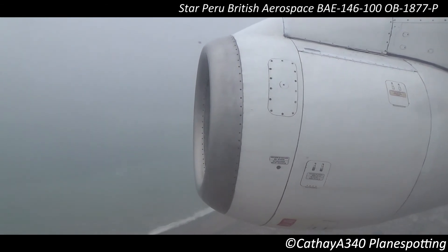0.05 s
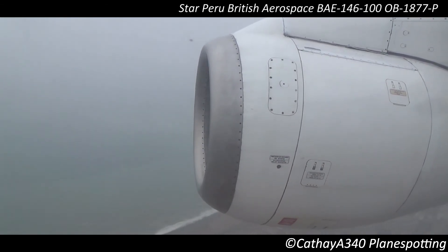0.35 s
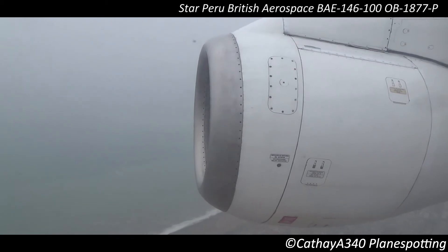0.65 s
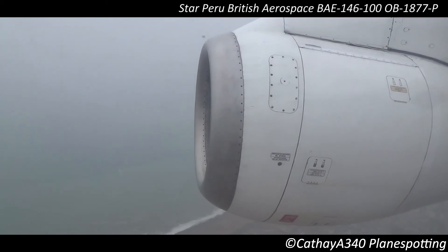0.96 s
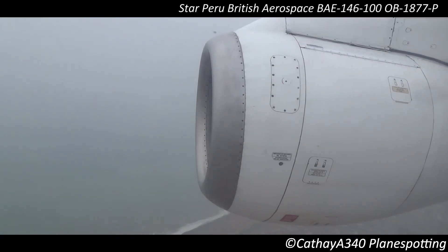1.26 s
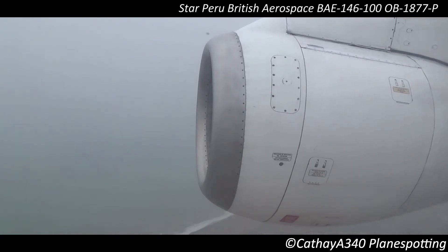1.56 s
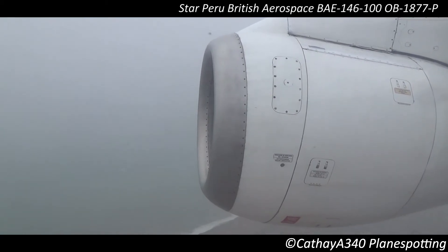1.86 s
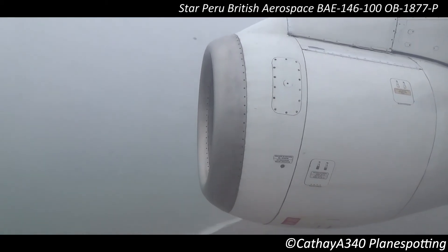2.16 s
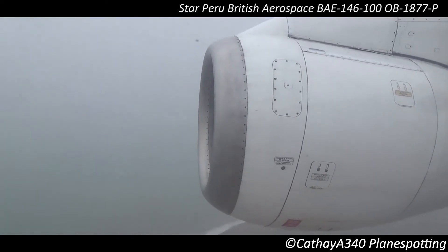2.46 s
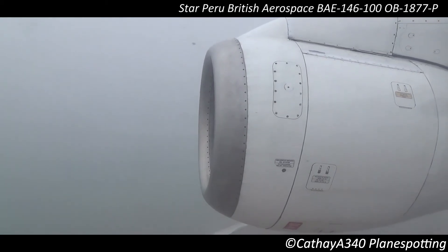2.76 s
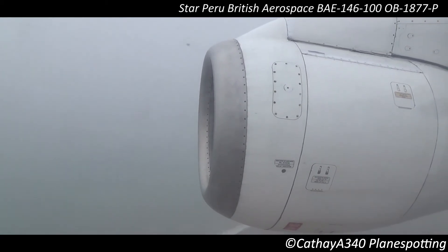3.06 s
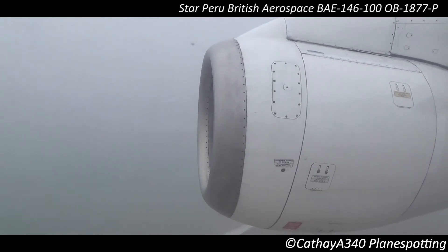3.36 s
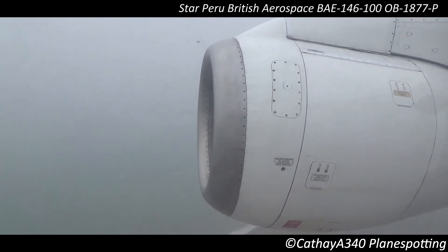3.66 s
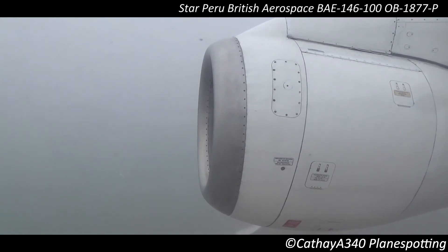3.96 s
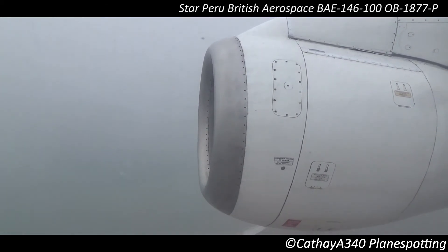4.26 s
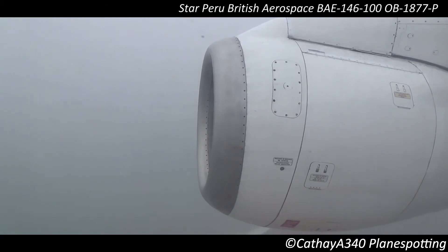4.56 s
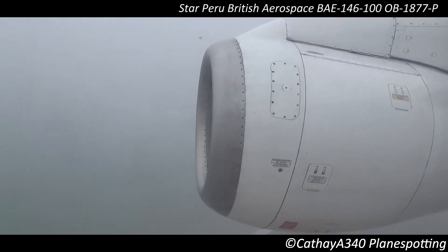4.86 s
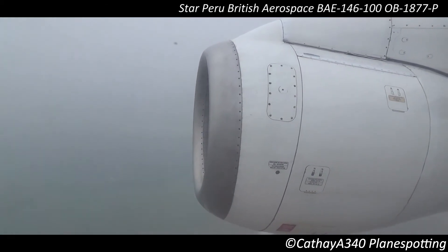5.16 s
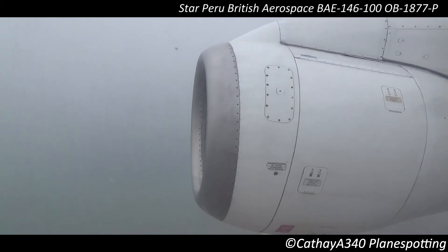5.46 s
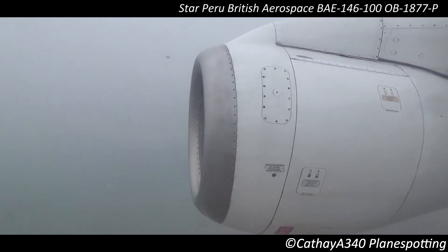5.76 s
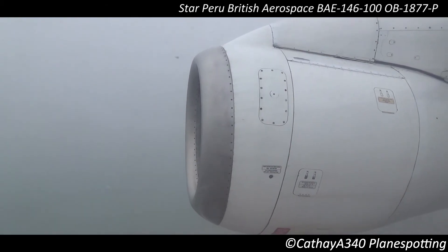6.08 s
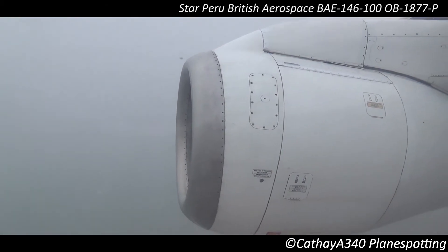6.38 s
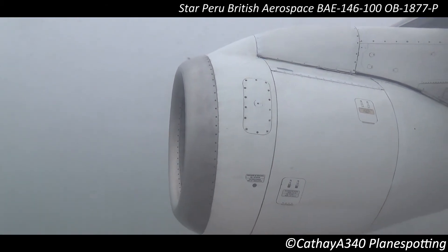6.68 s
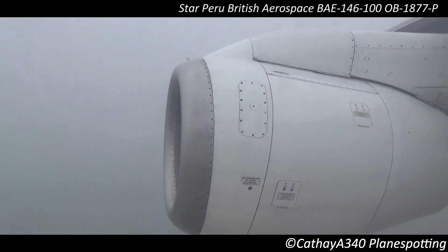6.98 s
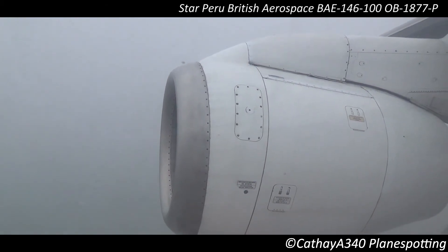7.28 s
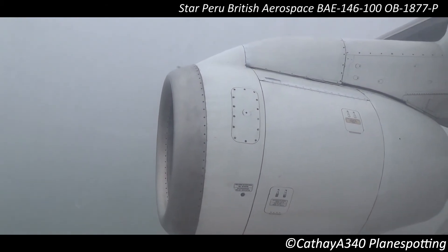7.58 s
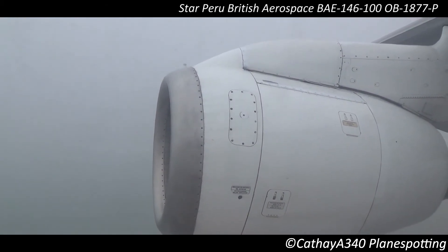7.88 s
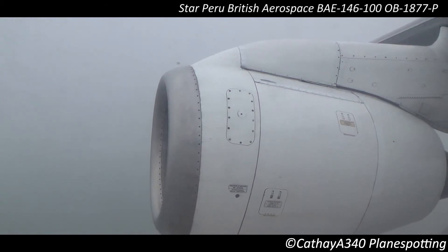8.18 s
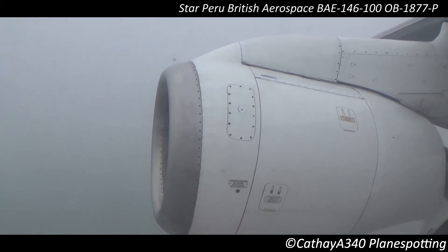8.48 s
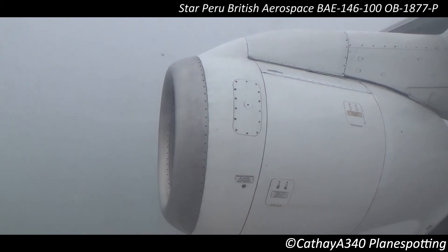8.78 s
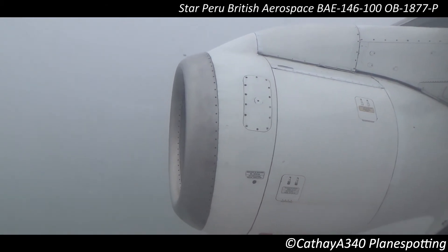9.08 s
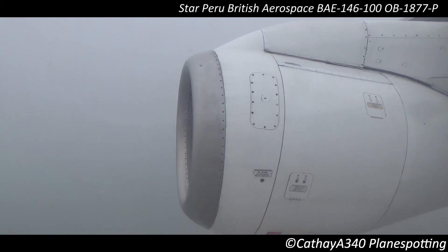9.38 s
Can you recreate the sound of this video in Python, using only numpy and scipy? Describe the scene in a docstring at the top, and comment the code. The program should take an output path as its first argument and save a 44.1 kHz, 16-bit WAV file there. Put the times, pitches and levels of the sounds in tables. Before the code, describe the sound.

From the start, a loud, deep roar of air fills the cabin of a climbing jet airliner, heard at a window beside one engine. The engines beat together in a low throbbing hum, with thin buzzing whines, steady machinery tones and a fine hiss above it. All of this continues for about nine and a half seconds. At about 1.5 seconds the cabin trim gives one dull bump. From there a low, hollow howl, at first blended into the hum, climbs slowly in pitch until the end. It swells and fades, strongest around 3.7, 7 and 8.2 seconds, and shifts a little between left and right. When howl and hum throb together, the whole sound dips slightly, giving a gentle pumping. The deepest rumble eases after 8 seconds, and a faint, sharp plastic click comes at about 9.3 seconds.

```python
"""Inside a four-engined jet airliner in the climb, at a window beside one engine. From the start, air roars
along the fuselage, four fans nearly in step beat in a low hum and shed thin buzz-saw whines, machinery holds
steady tones and a cabin monitor whines thinly. At 1.5 s the trim bumps dully; from then on a hollow howl,
likely air over the moving wing flaps, climbs in pitch. Whenever howl and hum throb together, an automatic gain
control ducks the whole sound, roar and hiss included. Near the end comes a faint click."""
import sys
import numpy as np
from scipy import signal
from scipy.fft import rfft, irfft
from scipy.io import wavfile
from scipy.ndimage import uniform_filter1d, minimum_filter1d

SR = 44100
rng = np.random.default_rng(int(sys.argv[2]) if len(sys.argv) > 2 else 0)


def unload_audio(sound):
    """Save the sound as a 16-bit wav file, at the path given as the first command line argument."""
    columns = np.transpose(np.atleast_2d(sound))
    # keep every value between -1 and 1, then stretch to whole-number steps
    steps = np.round(np.clip(columns, -1, 1) * 32767)
    wavfile.write(sys.argv[1], SR, steps.astype(np.int16))


N = 420258
TIME, BIN_HZ = np.arange(N) / SR, np.fft.rfftfreq(N, 1 / SR)


def amp(db):
    """Amplitude grows tenfold with every 20 dB."""
    return 10 ** (np.asarray(db) / 20)

def unit(x):
    """Normalisation to an rms of one."""
    return x / np.sqrt(np.mean(abs(x) ** 2) + 1e-20)

def curve(rows, column=1):
    """Linear interpolation of one table column over time."""
    rows = np.asarray(rows)
    return np.interp(TIME, rows[:, 0], rows[:, column])

def at_frequency(rows, hz):
    """Interpolation of a spectrum on a logarithmic frequency axis."""
    row_hz, value = np.transpose(rows)
    return np.interp(np.log(hz + 1), np.log(row_hz + 1), value)

def drift(rate_hz):
    """Low-pass noise: a random motion of rms one, mostly slower than rate_hz."""
    steps = N // 128
    hz = np.fft.rfftfreq(steps, 128 / SR)
    slow = irfft(rfft(rng.standard_normal(steps)) * (hz > 0) / (1 + (hz / rate_hz) ** 2), steps)
    return np.interp(TIME, np.linspace(0, TIME[-1], steps), unit(slow))

def turns_of(hz):
    """Phase, in cycles, is the integral of frequency."""
    return np.cumsum(hz * np.ones(N)) / SR

def tone(turns, unsteady, rate_hz):
    """Scattering by turbulence makes part of a sine random, so its level and phase waver."""
    angle = 2 * np.pi * (turns + rng.random())
    in_phase = np.sqrt(2 * (1 - unsteady ** 2)) + unsteady * drift(rate_hz)
    quadrature = unsteady * drift(rate_hz)
    return in_phase * np.cos(angle) + quadrature * np.sin(angle)


# Cabin air and wall panel resonances. Each row: frequency in Hz, width in Hz, lift in dB.
RESONANCES = [(58.7, 4, 10.5), (178.2, 12.5, 4.5), (373, 13, 2), (551.5, 60, 3.5), (827, 96, 2.5),
              (1650, 250, 2)]
# Likeness of the sound at the two ears. Each row: frequency in Hz, correlation from 0 to 1.
EAR_CORRELATION = [(25, .88), (60, .97), (210, .98), (330, .965), (770, .97), (1200, .985), (1800, .998),
                   (4800, .998), (5600, .85), (6400, .72), (8500, .8), (10500, .9), (12000, .9995)]

def cabin_noise(spectrum):
    """Resonance colours broadband noise, which reaches the two ears partly correlated."""
    lift_db = sum(db / (1 + (2 * (BIN_HZ - hz) / width) ** 4) for hz, width, db in RESONANCES)
    common, apart = rfft(rng.standard_normal((2, N))) * amp(at_frequency(spectrum, BIN_HZ) + lift_db)
    correlation = at_frequency(EAR_CORRELATION, BIN_HZ)
    common, apart = common * np.sqrt(1 + correlation), apart * np.sqrt(1 - correlation)
    return unit(irfft([common + apart, common - apart], N))

# Roar through the cabin wall. Each row: frequency in Hz, relative spectral density in dB.
ROAR_SPECTRUM = [(10, -62), (30, -68), (45, -52), (72, -49), (92, -40), (145, -39), (195, -41), (235, -43),
                 (275, -42.5), (350, -47.5), (480, -54.5), (700, -58), (1000, -65), (1400, -71.5),
                 (2200, -79.5), (4000, -93), (8000, -115)]
# Hiss of the intake and air vents. Each row: frequency in Hz, relative spectral density in dB.
HISS_SPECTRUM = [(500, -105), (2000, -80.5), (3000, -83), (4400, -86.5), (6300, -85.5), (7300, -83),
                 (8600, -81), (10000, -83.5), (11500, -84.5), (13000, -87.5), (14000, -90), (15500, -95)]
# Slow airflow changes. Each row: time in seconds, then gains in dB for roar, hiss and the roar's rumble.
AIRFLOW_GAINS = [(0, 0, -0.3, -0.5), (1.6, -0.3, 0.1, 0), (3.55, 0.2, 0, -0.5), (4.0, 0, 0, 0.5),
                 (5.3, 0, -.3, 0.2), (6.6, 0.5, 1.1, .5), (8.1, -0.2, 0.3, -2), (9.53, 0, -0.5, -6)]

def airflow():
    """Boundary-layer turbulence roars and rumbles; a finer hiss flutters with the same gusts."""
    gusts_db = 0.3 * drift(rate_hz=41)
    wall = cabin_noise(ROAR_SPECTRUM)
    rumble = signal.sosfiltfilt(signal.butter(2, 95, fs=SR, output="sos"), wall)
    roar = wall - rumble + amp(curve(AIRFLOW_GAINS, column=3)) * rumble
    roar_db = -15.5 + gusts_db + curve(AIRFLOW_GAINS, column=1)
    hiss_db = -43.5 + gusts_db + curve(AIRFLOW_GAINS, column=2)
    return amp(roar_db) * roar + amp(hiss_db) * cabin_noise(HISS_SPECTRUM)

# The howl's lower mode. Each row: time in seconds, pitch in Hz, level in dB.
LOWER_MODE = [(0, 97.85, -19), (1.4, 97.4, -16.5), (1.75, 98.4, -15.5), (2.15, 99.8, -23.5),
              (2.8, 102.2, -21), (3.0, 102.7, -16.5), (3.44, 106.5, -37), (3.68, 110.7, -8),
              (3.95, 112.3, -14.5), (4.9, 116, -14), (5.28, 118.4, -28), (5.88, 123.3, -18),
              (6.45, 127.4, -19.5), (7.1, 130.8, -12.5), (7.48, 134.3, -17), (8.2, 140.3, -11),
              (9.15, 149.3, -15), (9.53, 152.5, -27)]
# Its mostly weaker upper mode. Each row: time in seconds, level in dB.
UPPER_MODE = [(0, -33), (1.3, -23.5), (4.4, -42), (5.4, -23), (6.45, -44), (6.95, -22), (7.4, -26),
              (8.7, -22), (9.3, -15.5)]

def flap_howl(mode_spacing_hz=15.5):
    """Flow across a gap in the wing excites two fluttering modes that rise together as the gap closes."""
    hz = curve(LOWER_MODE, column=1)
    lower = tone(turns_of(hz), unsteady=0.18, rate_hz=11)
    upper = tone(turns_of(hz + mode_spacing_hz), unsteady=0.14, rate_hz=7)
    return amp(curve(LOWER_MODE, column=2)) * lower + amp(curve(UPPER_MODE)) * upper

# Shaft speeds. Each entry: one fan's turns per second, nearest fan first.
SHAFT_HZ = [109.06, 110.06, 110.75, 111.47]
# Shaft hum. Each entry: one fan's starting level in dB.
SHAFT_HUM_DB = [-18.2, -32.5, -30, -29]
# Strongest shaft harmonics. Each row: one fan's orders, each with its relative level in dB.
SHAFT_ORDERS = [ {2: -37, 9: -49, 13: -52, 16: -59, 24: -66, 25: -65, 40: -59.3, 65: -65, 76: -64, 86: -64,
                90: -64, 95: -66, 99: -67, 104: -68, 120: -64}, {2: -33, 4: -46, 11: -52, 12: -56, 13: -49,
                15: -53, 16: -57, 19: -62, 21: -61, 40: -59.3, 65: -68, 71: -67, 77: -64, 80: -61, 90: -65,
                100: -68}, {2: -37, 40: -64, 80: -66}, {9: -51, 20: -65, 40: -64, 80: -63}]
# The nearest fan's whistle at twice its blade rate. Each row: time in seconds, relative level in dB.
BLADE_WHISTLE = [(0.1, -64), (0.46, -56), (3.49, -48.5), (3.65, -51), (4.87, -59), (5.77, -51), (5.95, -57),
                 (6.81, -50.5), (9.32, -61), (9.4, -59)]
BLADE_COUNT, BUZZ_DB = 40, [-54, -54, -61, -59]
HUM_FADE_DB_PER_S, WHINE_FADE_DB_PER_S = 0.34, 0.1

def fans():
    """Beating: four shafts at slightly different speeds make a throbbing hum; their harmonics whine."""
    shafts = [turns_of(hz + 0.05 * drift(rate_hz=0.4)) for hz in SHAFT_HZ]
    hum = sum(amp(db) * tone(turns, unsteady=0.3, rate_hz=3.4) for turns, db in zip(shafts, SHAFT_HUM_DB))
    hum *= amp(-HUM_FADE_DB_PER_S * TIME)
    # Turbulent air scatters short waves more, so high orders come and go.
    whine = sum(amp(db) * tone(order * turns, unsteady=0.25 + order / 350, rate_hz=1.2)
                for turns, orders in zip(shafts, SHAFT_ORDERS) for order, db in orders.items())
    whine *= amp(1 - WHINE_FADE_DB_PER_S * TIME)
    buzz = sum(amp(db) * buzz_saw(turns) for turns, db in zip(shafts, BUZZ_DB))
    whistle = tone(2 * BLADE_COUNT * shafts[0], unsteady=0.22, rate_hz=25)
    whistle *= amp(3 + curve(BLADE_WHISTLE))
    return hum, whine + buzz + whistle

def buzz_saw(turns, scatter_db=10, samples_per_turn=4096, groups=4):
    """Unequal blade shocks repeat every turn, giving a comb of shaft orders that swell in groups."""
    orders = np.arange(samples_per_turn // 2 + 1)
    envelope_db = at_frequency(HISS_SPECTRUM, orders * SHAFT_HZ[1])
    comb = amp(envelope_db + scatter_db * rng.uniform(-1, 1, len(orders)))
    comb = comb * np.exp(2j * np.pi * rng.random(len(orders)))
    comb *= (orders > 0) & (orders <= 3 * BLADE_COUNT)
    group = rng.integers(0, groups, len(orders))
    place_in_turn = (turns % 1 * samples_per_turn).astype(int)
    waves = [irfft(comb * (group == k), samples_per_turn)[place_in_turn] for k in range(groups)]
    return unit(sum(wave * amp(5.1 * drift(rate_hz=0.7)) for wave in waves))

# Tones of engine cores, pumps and blowers, and the thin whine of a cabin monitor. Each row: frequency in Hz,
# level in dB, # unsteadiness from 0 to 1, share from 0 to 1 by which the level follows TRANSMISSION.
MACHINE_TONES = [(251, -29.5, .5, 0), (256, -31, .6, 0), (312.2, -34, .5, 0), (711.1, -33.5, .15, .05),
                 (933.5, -44.5, .25, .1), (1867.2, -52, .2, .45), (2133.1, -61, .3, .3),
                 (2800.7, -50.8, .15, 1), (3734.7, -68, .3, .5), (15734, -66.3, .2, 0)]
# How well the whines carry to the window. Each row: time in seconds, relative level in dB.
TRANSMISSION = [(0.3, -57), (0.97, -53), (1.04, -58), (1.39, -55), (4.64, -57), (4.66, -55.5), (7.31, -56),
                (8.16, -63.5), (9.2, -65)]

def machines():
    """Structure-borne sound: rotating machinery sends tones of nearly constant pitch into the cabin; a cabin
    monitor adds a thin high whine."""
    reach_db = curve(TRANSMISSION)
    reach_db -= np.median(reach_db)
    sound = np.zeros(N)
    for hz, db, unsteady, share in MACHINE_TONES:
        turns = turns_of(hz + 0.5 * drift(rate_hz=0.5))
        sound += amp(db + share * reach_db) * tone(turns, unsteady, rate_hz=3.3)
    return sound

def burst(peak_s, half_width_s, db, band_hz):
    """A transient: band-limited noise under a Gaussian envelope."""
    band = signal.butter(2, band_hz, "band", fs=SR, output="sos")
    noise = unit(signal.sosfilt(band, rng.standard_normal(N)))
    return amp(db) * noise * np.exp(-((TIME - peak_s) / half_width_s) ** 2)

def cabin_trim():
    """Transients of plastic trim: a longer, lower one is a bump, a short, high one a click."""
    bump = burst(peak_s=1.525, half_width_s=0.035, db=-20, band_hz=(300, 620))
    click = burst(peak_s=9.344, half_width_s=0.002, db=-36, band_hz=(3000, 9000))
    return bump + click

def standing_waves(sound, spread_rad=0.13, step_hz=30):
    """Different cabin paths to the two ears give each tone its own small phase difference."""
    grid_hz = np.arange(0, SR / 2, step_hz)
    leading_side = rng.choice([-1, 1], SR)[:len(grid_hz)]
    phase = spread_rad * np.interp(BIN_HZ, grid_hz, leading_side) * (BIN_HZ < 12000)
    return irfft(rfft(sound) * np.exp(1j * np.array([phase, -phase])), N)

def ear_gains(difference_db):
    """An interaural level difference, split evenly between left and right."""
    return amp(np.array([difference_db, -difference_db]) / 2)

# Balance of all but howl and hum. Each row: frequency in Hz, left minus right in dB.
CABIN_BALANCE = [(60, 6.5), (92, 3.5), (140, 1), (210, -0.5), (330, -1), (500, -3), (770, -4.0),
                 (1170, 0.5), (1790, -1), (2740, -0.3), (4190, -1), (6410, 1), (9810, 0.0)]
# Balance of howl and hum. Each row: time in seconds, left minus right in dB.
BASS_BALANCE = [(0, 2.5), (1.9, 4), (3.2, 0), (4.1, 4.5), (5.6, 2.5), (6.7, 5), (7.6, -3.5), (8.6, -0.5),
                (9.53, 0.5)]

def scene():
    """Superposition of all sources; standing waves in the cabin favour one ear or the other."""
    hum, whines = fans()
    cabin = airflow() + standing_waves(whines + machines()) + cabin_trim()
    cabin = irfft(rfft(cabin) * ear_gains(at_frequency(CABIN_BALANCE, BIN_HZ)), N)
    return cabin + (flap_howl() + hum) * ear_gains(curve(BASS_BALANCE))

THRESHOLD_DB, RATIO, MAKEUP_DB = -6.5, 4, 1.5
DUCK_S, RECOVER_DB_PER_S, CUTOFF_HZ = 0.0065, 91, 15780

def record(dry):
    """Compression: gain drops fast on each throb and recovers more slowly; a low-pass limits the band."""
    peak_db = 20 * np.log10(abs(dry).max(0) + 1e-9)
    recovery_db, span = RECOVER_DB_PER_S * TIME, int(DUCK_S * SR)
    held_db = np.maximum.accumulate(peak_db + recovery_db) - recovery_db
    over_db = np.maximum(held_db - THRESHOLD_DB, 0)
    duck_db = uniform_filter1d(minimum_filter1d(-over_db, span), span) * (1 - 1 / RATIO)
    edge_fades = signal.windows.tukey(N, 300 / N)
    levelled = dry * amp(MAKEUP_DB + duck_db) * edge_fades
    low_pass = signal.firwin(2047, CUTOFF_HZ, window=("kaiser", 9), fs=SR)
    return signal.oaconvolve(levelled, low_pass[None], "same")


dry = scene()
out = record(dry)
unload_audio(out)
```